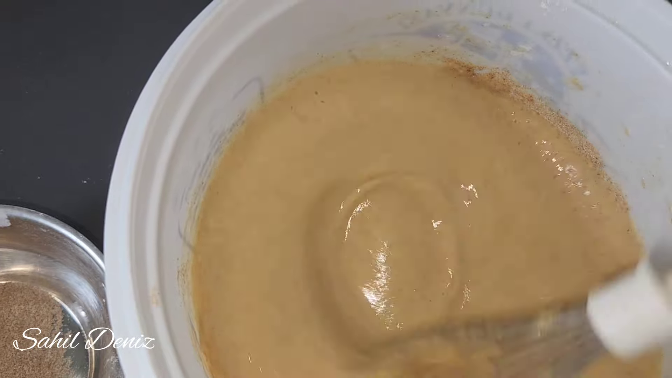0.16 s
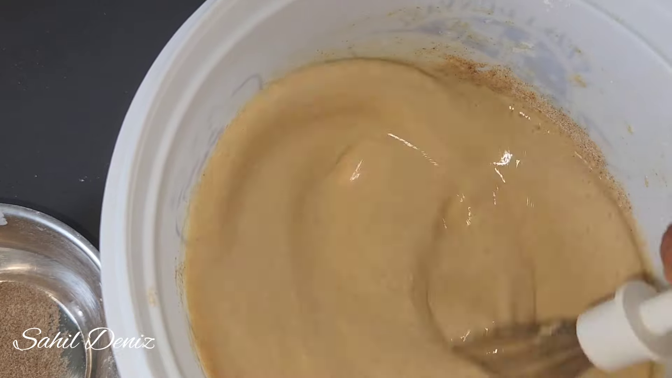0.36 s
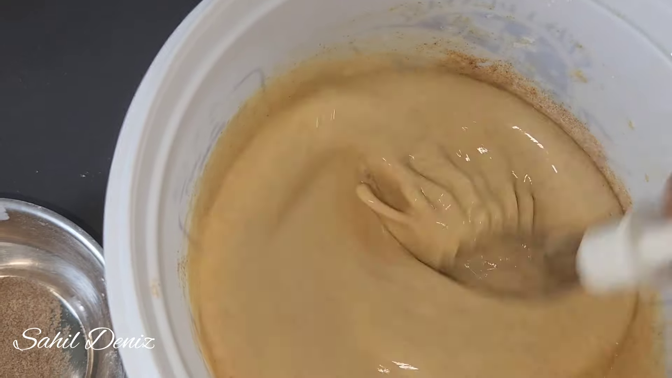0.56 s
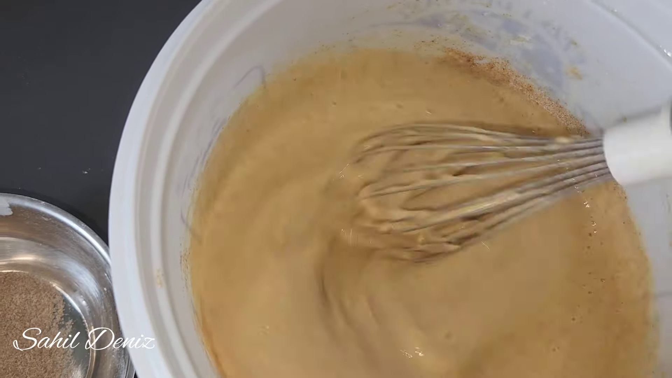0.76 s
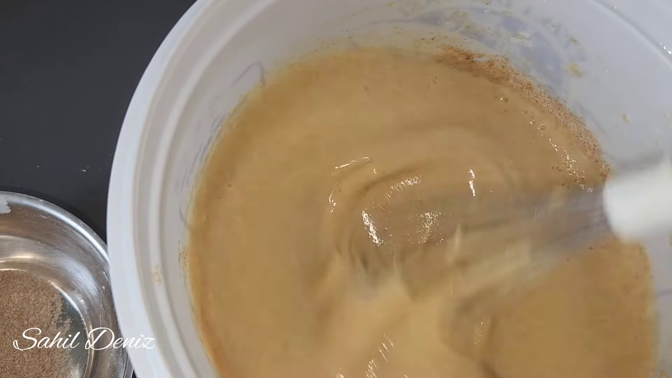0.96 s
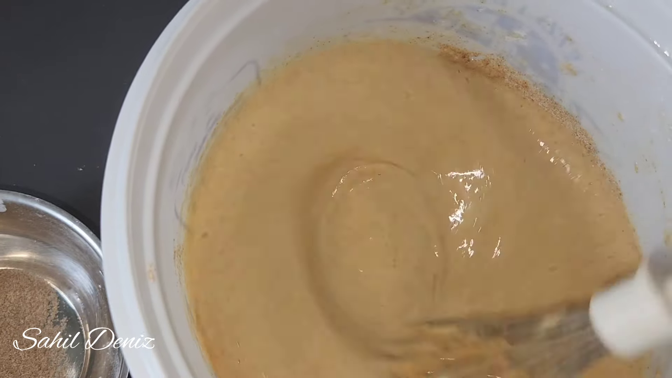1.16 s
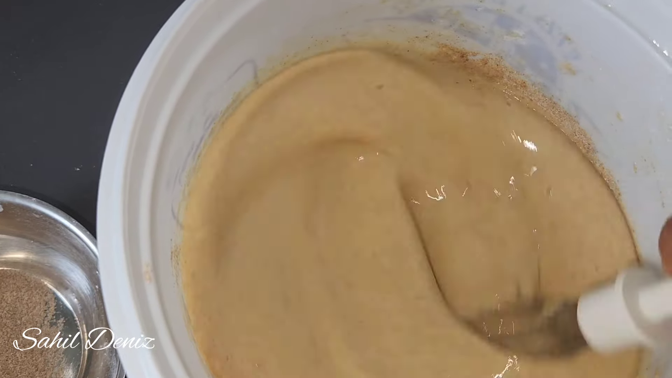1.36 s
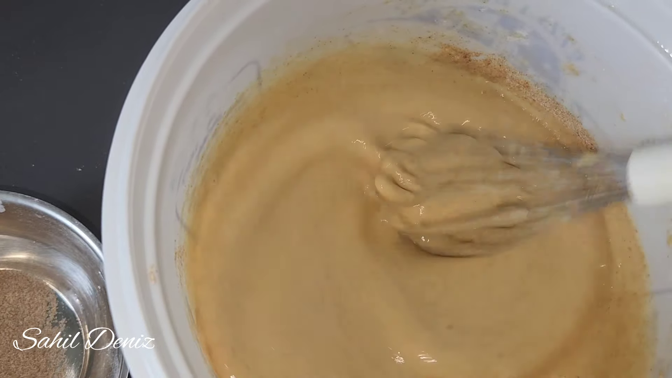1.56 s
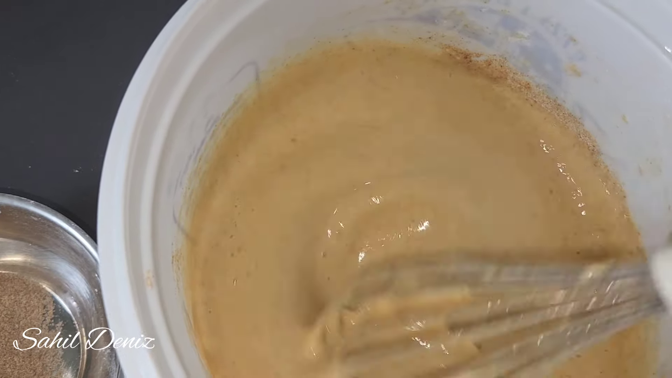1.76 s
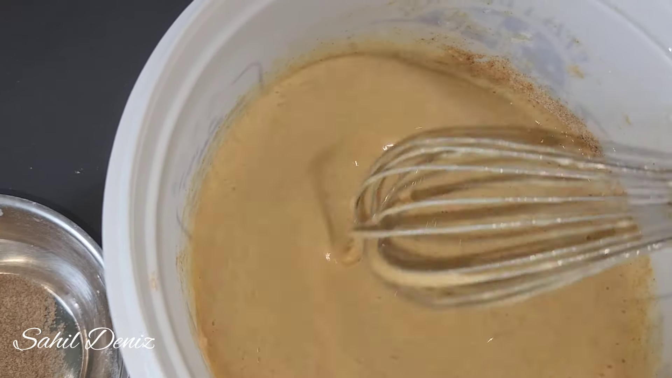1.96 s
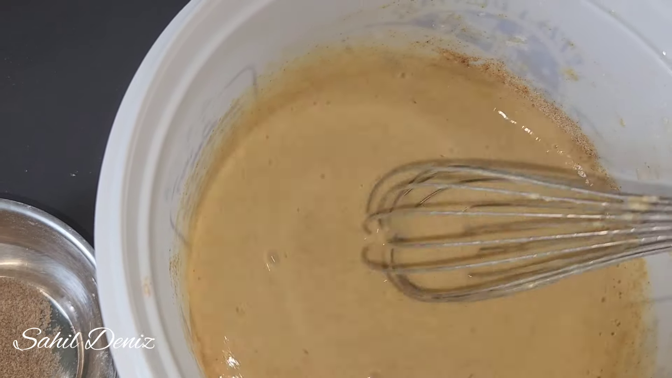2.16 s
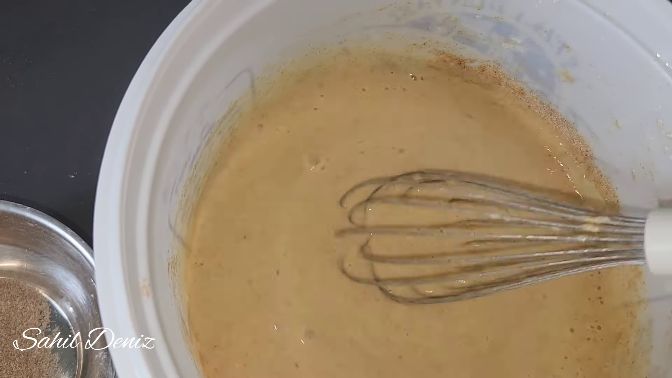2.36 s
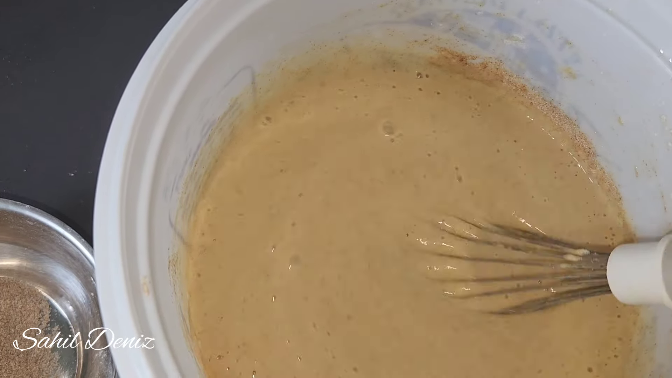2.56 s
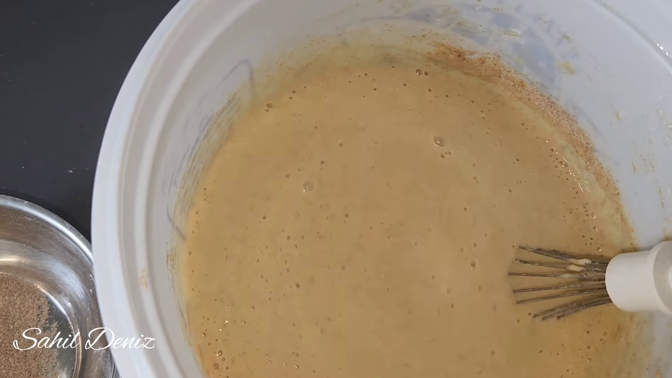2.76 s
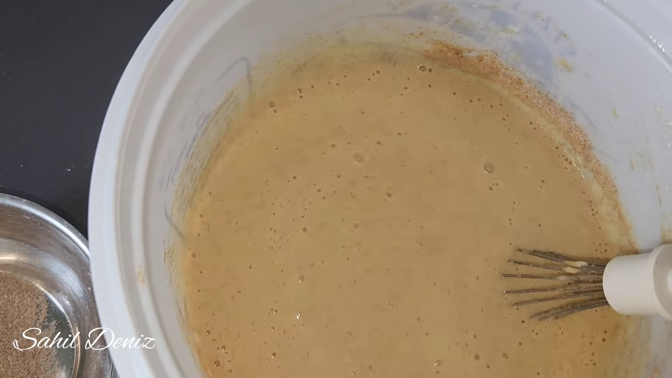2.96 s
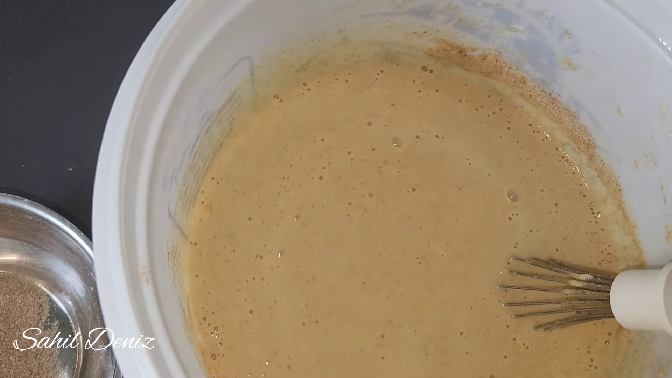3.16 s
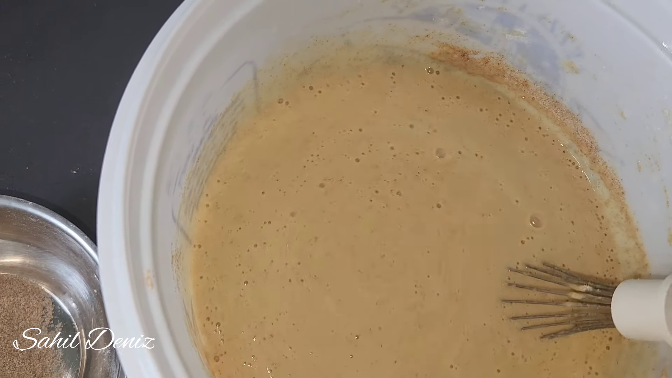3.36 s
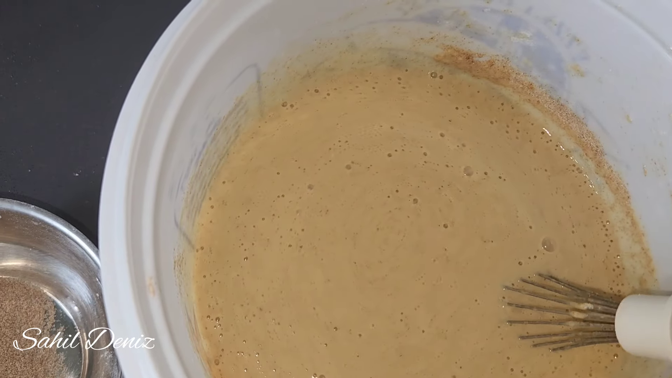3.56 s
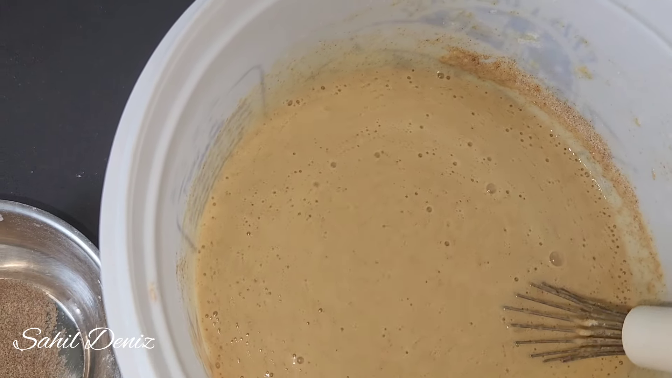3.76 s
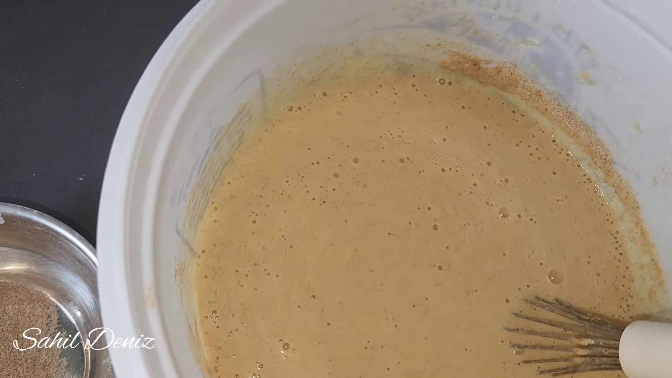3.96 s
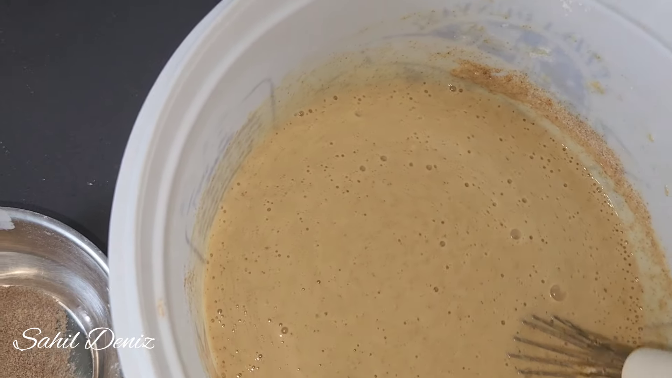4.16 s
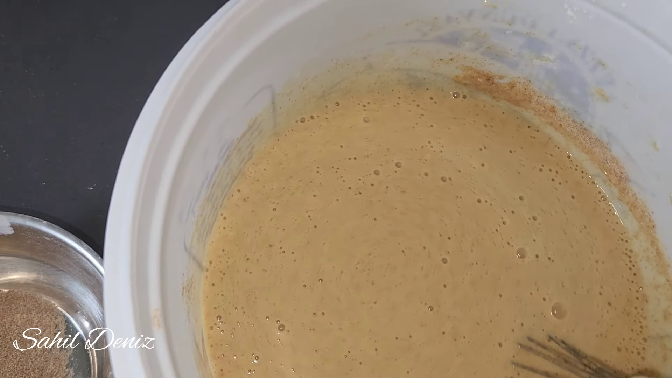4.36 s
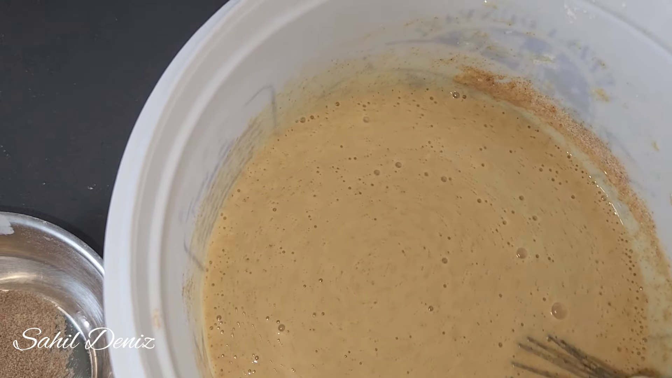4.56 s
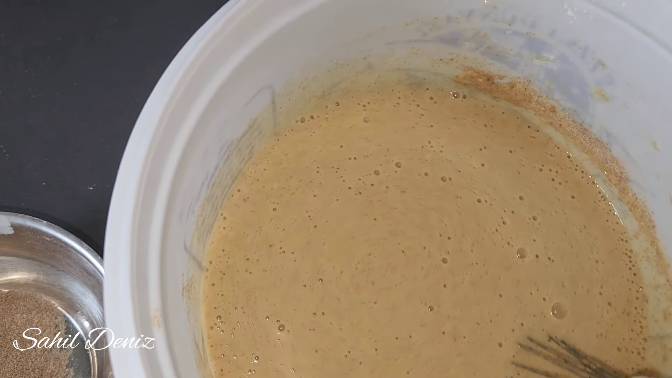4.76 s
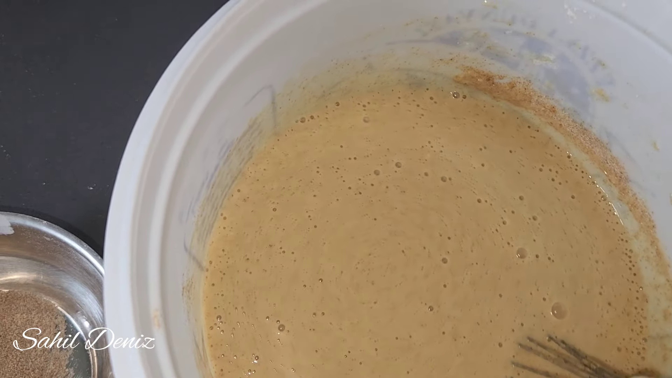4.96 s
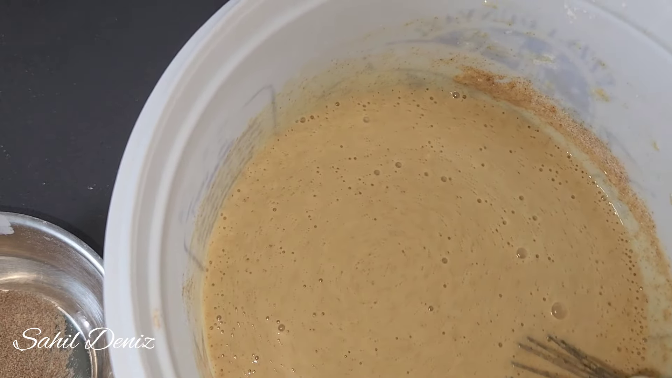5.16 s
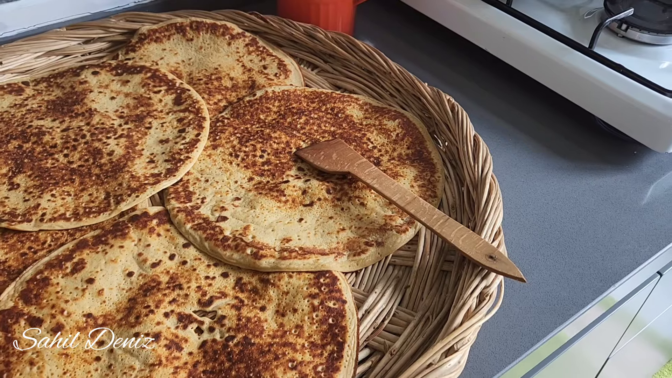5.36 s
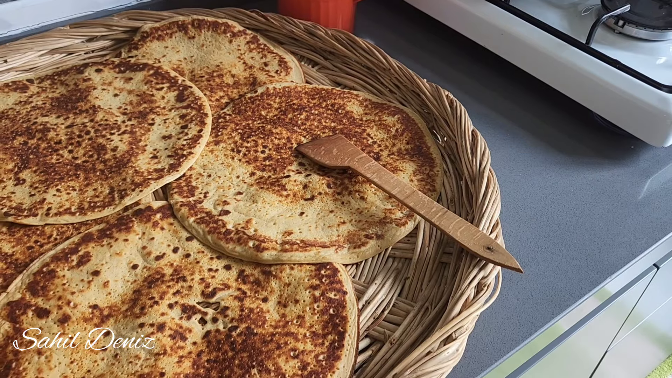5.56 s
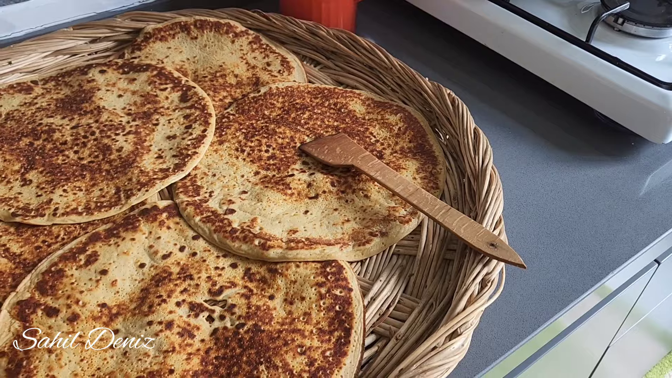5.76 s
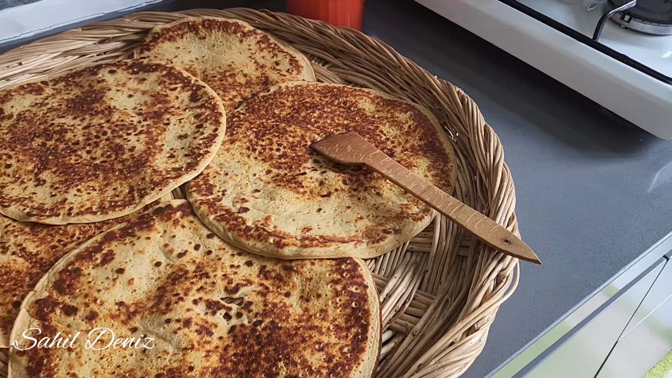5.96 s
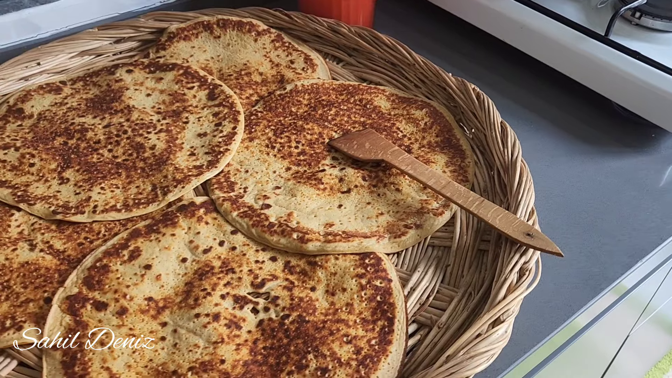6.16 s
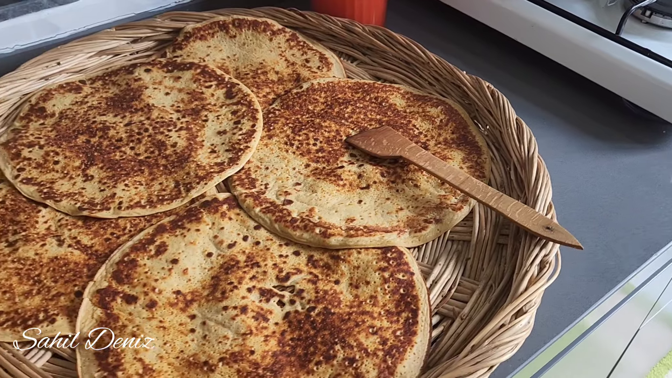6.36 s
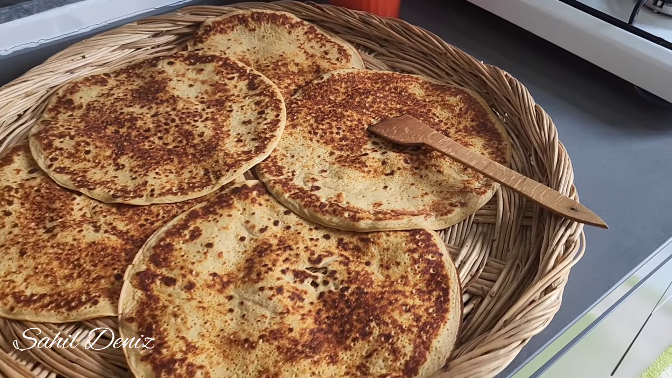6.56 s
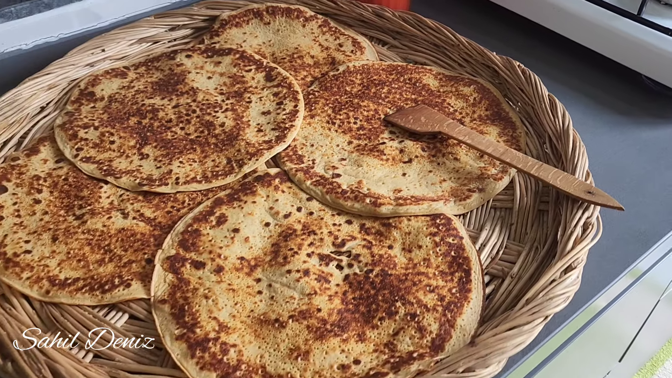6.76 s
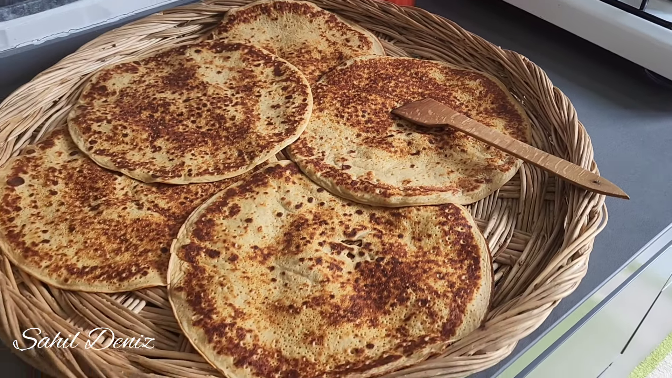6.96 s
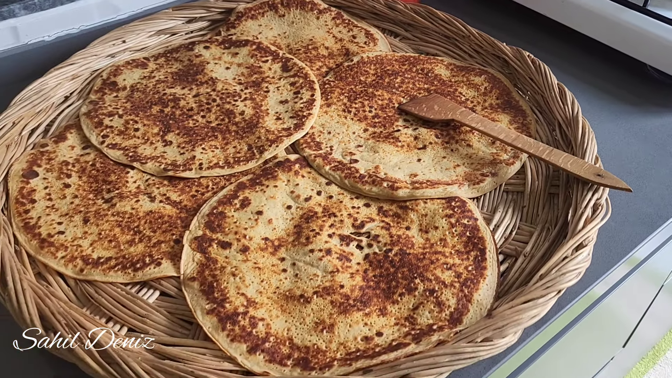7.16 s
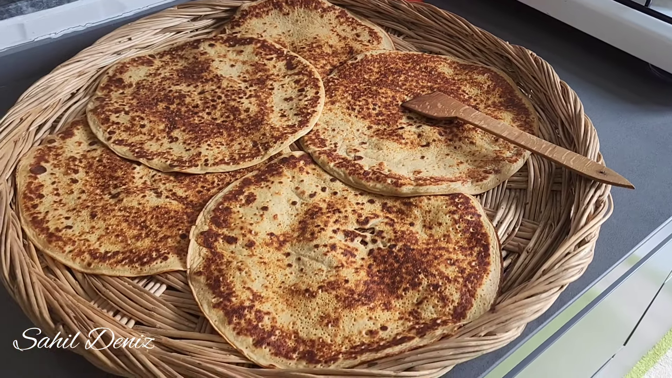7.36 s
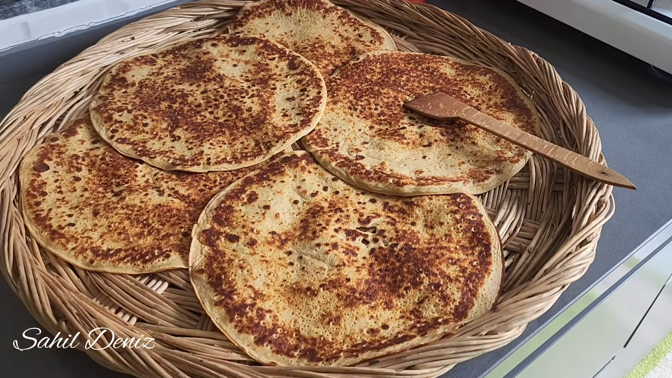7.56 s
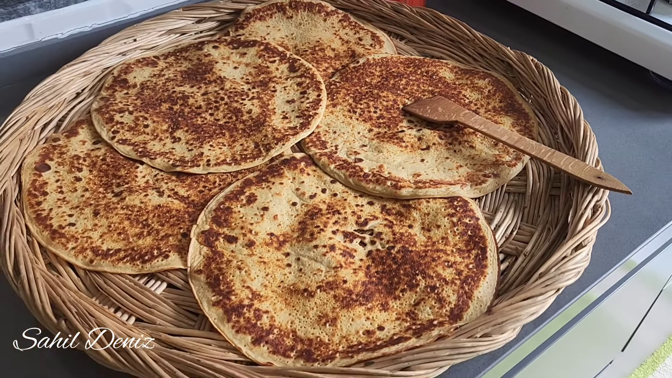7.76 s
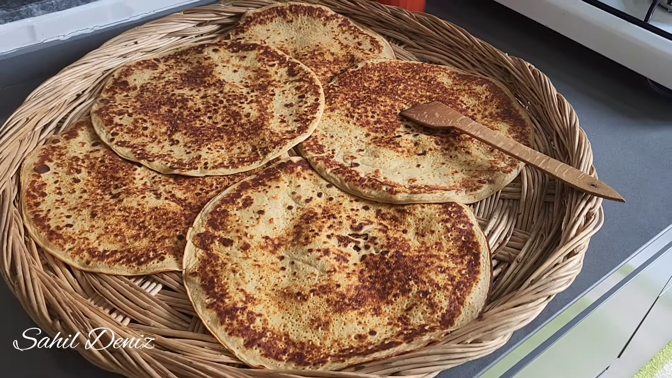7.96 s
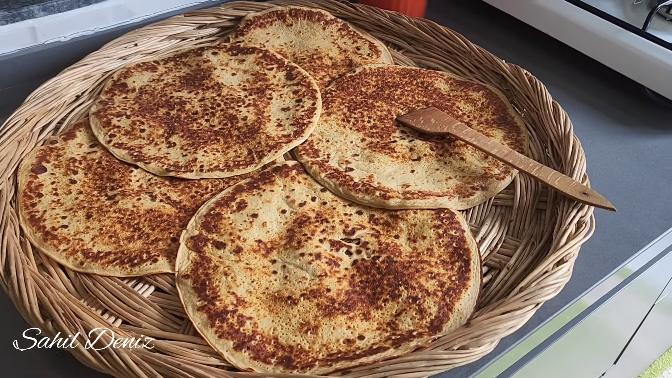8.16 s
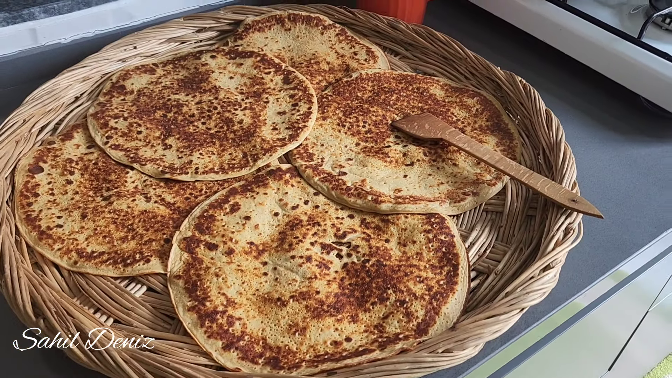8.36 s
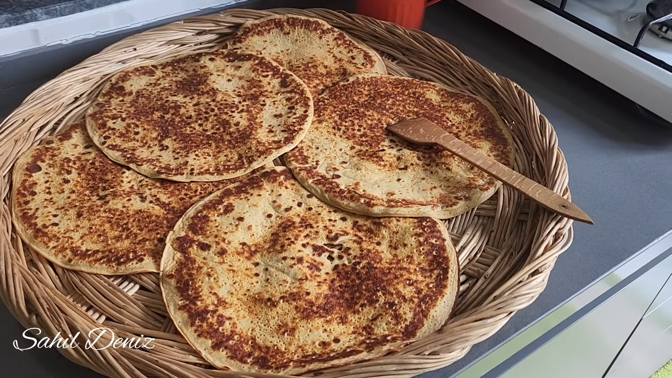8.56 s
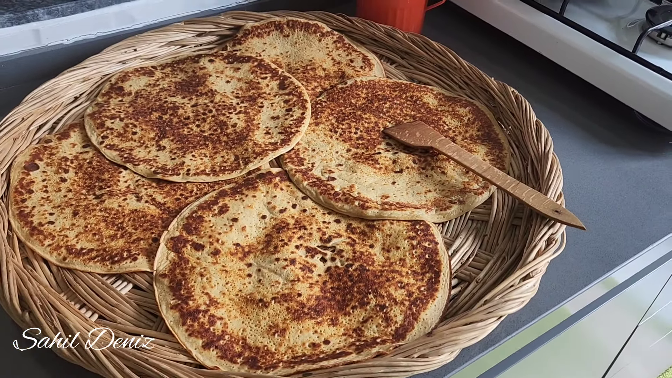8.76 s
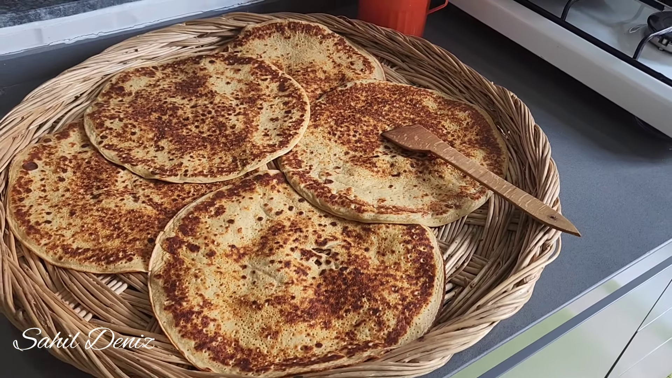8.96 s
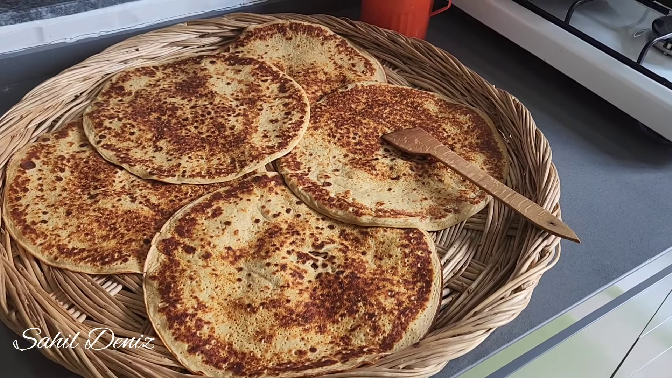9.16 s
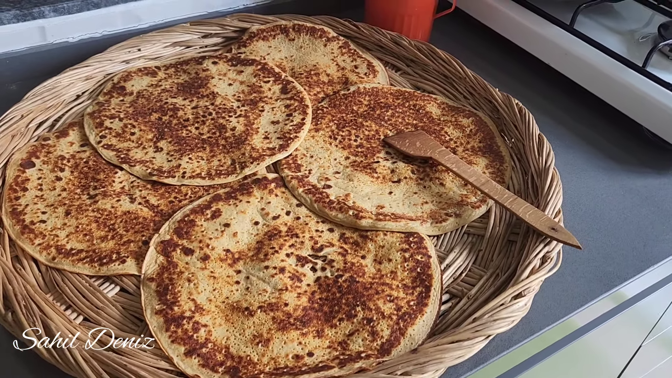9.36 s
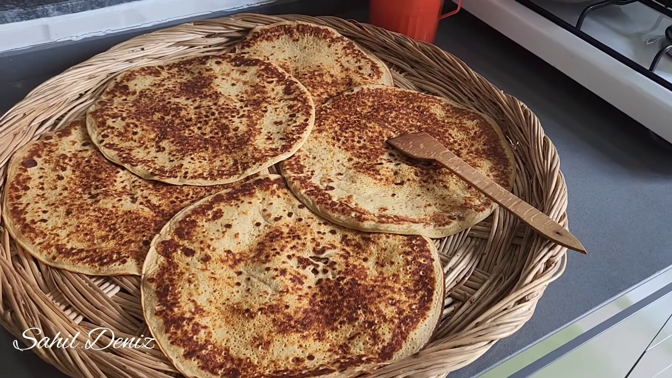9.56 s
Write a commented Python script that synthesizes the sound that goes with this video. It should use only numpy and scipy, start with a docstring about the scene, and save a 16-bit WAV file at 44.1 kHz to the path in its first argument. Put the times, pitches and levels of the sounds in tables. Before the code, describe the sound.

From the start, a wire whisk beats runny batter in a plastic bowl, close and left of a phone microphone in a kitchen. Sharp, uneven knocks mix with wet squelches, round gloops and dull thuds through the counter, loudest around 0.25 and 0.75 seconds. The beating ends near 1.7 seconds, and drops tick off the lifted whisk until about 2.2. A far engine drone enters around 1.2 seconds, rising slowly in pitch and receding after 2.8, over faint traffic rumble and room tone. The whisk is laid down with light taps at 2.6 and a soft knock at 3 seconds, rasping and squeaking faintly along the rim until about 4.7. At 5.2 seconds everything cuts to silence for an instant. A quiet, steady airy hiss with a low hum follows, shifting slightly in colour, with barely audible rustles near 7.8 and 9.4 seconds, ending around 9.6.

```python
"""Sharp plastic knocks and wet squelches, left of a phone: a wire whisk beats runny batter in a bowl.
The wires strike the wall and drag through the batter; drops tick off the lifted whisk, which is laid
down and rasps along the rim over room tone, a far engine drone and a traffic rumble.
After a short silent cut the phone drifts across a quiet kitchen filled with a steady airy hiss."""
import sys
import numpy as np
from scipy import signal
from scipy.fft import rfft, irfft
from scipy.io import wavfile
from scipy.ndimage import uniform_filter1d, map_coordinates

SR = 44100
rng = np.random.default_rng(int(sys.argv[2]) if len(sys.argv) > 2 else 0)


def int16_out(signal):
    """Quantize to a 16-bit WAV file."""
    q = np.round(np.clip(np.atleast_2d(signal).T, -1, 1) * 32767)
    wavfile.write(sys.argv[1], SR, q.astype(np.int16))


N = 423360
TIME = np.arange(N) / SR


def undb(db):
    return 10 ** (np.asarray(db) / 20)


def unit(x):
    return x / np.sqrt(np.mean(x ** 2))


def pan(left_minus_right_db):
    return undb(np.array([left_minus_right_db, -left_minus_right_db]) / 2).reshape(2, -1)


def bandpass(x, lo_hz, hi_hz, order=2):
    return signal.sosfilt(signal.butter(order, [lo_hz, hi_hz], "band", fs=SR, output="sos"), x)


def add(track, start_s, sound):
    i = int(start_s * SR)
    track[:, i:i + sound.shape[1]] += sound[:, :N - i]


def automation(table):
    """One lane per column, ramping between the times in the first column."""
    times, *columns = np.transpose(table)
    return [np.interp(TIME, times, column) for column in columns]


def wobble(per_s):
    """Ramps between random values; spread near 1."""
    hold = int(SR / per_s)
    return uniform_filter1d(np.repeat(rng.standard_normal(N // hold + 1), hold), hold)[:N]


def ring(modes, scatter_db, attack_cycles=0.99):
    """Struck modes in stereo; the higher the mode, the further its phase turns between the sides."""
    hz, db, t60 = np.transpose(modes)[:, :, None]
    t = np.arange(int(t60.max() * SR)) / SR
    strength, detune, turn = rng.standard_normal((3, len(modes), 1))
    attack = 1 - np.exp(-(t * hz / attack_cycles) ** 2)  # a soft contact builds up gradually
    envelope = attack * undb(db + scatter_db * strength - 60 * t / t60)
    phase = 2 * np.pi * hz * (1 + .012 * detune) * t
    out = np.array([np.sum(envelope * np.sin(phase + side * turn * hz / 6000), axis=0) for side in (0, 1)])
    return out / np.sqrt(np.sum(undb(db) ** 2))


def grit(per_s, spread_db):
    """Random clicks of unequal size: wires catching and letting go."""
    size = rng.standard_normal(N) * undb(spread_db * np.minimum(rng.exponential(size=N), 3))
    return size * (rng.random(N) < per_s / SR)


def rub(friction, modes):
    """Friction keeps a set of modes ringing; rms 1."""
    return unit(signal.fftconvolve(friction[None], ring(modes, 0), axes=1)[:, :N])


def crackle(modes, ring_db, lo_hz, hi_hz):
    """Dense, wide crackle, tinted by the modes it shakes; rms 1."""
    centre = grit(9000, 7.1)
    wide = np.array([grit(8000, 3.6), grit(9000, 2.5)])
    broad = unit(bandpass(centre + 6.2 * wide, lo_hz, hi_hz))
    return unit(broad + undb(ring_db) * rub(centre, modes))


def air(spectrum, peaks, correlation, peak_db=0):
    """A stereo noise bed with resonances on top; rms 1."""
    f = np.maximum(np.arange(N // 2 + 1) * SR / N, 1)

    def curve(table):
        hz, values = np.transpose(table)
        return np.interp(np.log(f), np.log(hz), values)

    power = undb(curve(spectrum)) ** 2
    for hz, width, db in peaks:
        power += undb(db + peak_db) ** 2 / (1 + (2 * (f - hz) / width) ** 2) ** 1.3
    alike = np.clip(curve(correlation), -1, 1)
    mid = irfft(rfft(rng.standard_normal(N)) * np.sqrt(power * (1 + alike)), N)
    side = irfft(rfft(rng.standard_normal(N)) * np.sqrt(power * (1 - alike)), N)
    return unit(np.array([mid + side, mid - side]))


# Modes of the clacky wall, the hollow belly and the bright wires: f/Hz, level/dB, t60/s
WALL_MODES = [(1421, -2.5, 0.018), (2105, -4, 0.023), (2483, -14.5, 0.046), (2565, -16.5, 0.01),
              (3070, 2.5, 0.0094), (3900, -7.5, 0.019), (4170, 3, 0.0067), (4510, -7, 0.011),
              (4840, -14, 0.023)]
BELLY_MODES = [(336.2, -10, 0.11), (394, -4, 0.052), (575, -13, 0.081), (609, 2, 0.04), (697, -1, 0.037),
               (754, 2.5, 0.01), (1010, -7.5, 0.05)]
WIRE_MODES = [(5700, -3, .006), (6250, -1, .005), (6840, -2, .004), (7300, -1, .006), (8200, -2, .004),
              (9500, -4, .003), (11000, -5, .002), (12600, -6, .002), (14300, -7, .002)]
# Whisk hits on the bowl: t/s, wall level/dB, struck spot f/Hz, belly level/dB, wire level/dB
KNOCKS = [(0.0527, -34.5, 4020, -59, -48), (0.0573, -39, 4090, -46, -31), (0.0853, -19, 3100, -32.5, -19.5),
          (0.11, -33, 1530, -27, -49), (0.2432, -17, 1950, -10, -11), (.297, -33, 3680, -29, -34),
          (0.3118, -19.5, 3470, -26, -31), (0.3135, -20.5, 4060, -23.5, -34), (.477, -38.5, 4640, -67, -41),
          (0.4895, -45, 4770, -62, -36), (0.4975, -37.5, 3180, -60, -50), (0.5025, -40, 3860, -59, -41),
          (.5743, -26.5, 2030, -25.5, -40), (0.5854, -30, 3100, -49, -32), (0.6377, -46, 1490, -30.5, -52),
          (.6578, -34.5, 2170, -56, -43), (0.7351, -10.5, 3160, -44, -21.5),
          (0.7393, -17, 2040, -30, -25.5), (0.75, -33, 2190, -55, -35), (0.833, -32, 2250, -25, -38),
          (.8798, -29.5, 1400, -25, -52), (.9962, -44, 3870, -70, -27.5), (1.072, -27.5, 3900, -42.5, -35),
          (1.1219, -29.5, 2480, -25.5, -51), (1.2349, -26.5, 4070, -47, -13.5),
          (1.246, -40, 4060, -61, -25), (1.297, -26, 2780, -31, -39), (1.3929, -41, 2420, -31.5, -59),
          (1.414, -34, 2450, -36, -52), (1.5143, -43, 4500, -67, -38), (1.5715, -19.5, 1360, -36, -26.5),
          (1.5831, -24, 3070, -43, -44), (1.62, -41, 1590, -35, -39), (2.6115, -59, 2570, -48, -72),
          (2.6282, -52, 1540, -44.5, -79), (3.032, -30.5, 4100, -31.5, -43),
          (3.0415, -34.5, 1470, -38, -63), (3.052, -34, 2040, -35.5, -52)]
SPOT_DB, SPOT_T60_S = 12, 0.006
LIFT_S, LIFT_FADE_S = 1.687, 0.13  # the whisk leaves the batter


def knocks():
    """Several wires land within a few ms; wall, wires and belly ring on."""
    out, t = np.zeros((2, N)), np.arange(500) / SR
    # laid down, the whisk rocks the low belly modes: darker and longer
    rocked = [(hz, db - 9.5 * np.log2(hz / BELLY_MODES[0][0]), 1.9 * t60) for hz, db, t60 in BELLY_MODES]
    for start, wall_db, spot_hz, belly_db, wire_db in KNOCKS:
        landing = 0.16 * rng.standard_normal((1, len(t))) * np.exp(-t / 0.0025)
        landing[0, 0] = 1  # the first wire hits hardest
        wall_pan = pan(16.5 - 3 * rng.standard_normal())
        wall = ring(WALL_MODES + [(spot_hz, SPOT_DB, SPOT_T60_S)], 3.3) * undb(wall_db) * wall_pan
        wires = ring(WIRE_MODES, 2.8) * undb(wire_db) * pan(3.2)
        belly = ring(rocked if start > LIFT_S else BELLY_MODES, 2.014) * undb(belly_db) * pan(2.5)
        add(out, start, signal.fftconvolve(wall, landing, axes=1))
        add(out, start, signal.fftconvolve(wires, landing, axes=1))
        add(out, start, belly)
    return out


# Low modes of the counter: f/Hz, level/dB, t60/s
COUNTER_MODES = [(59, -5.5, 0.42), (97.2, 1.5, 0.56), (122.7, 4.5, 0.27), (141, -5.5, 0.3)]
# Weight under the hits: t/s, level/dB, main ring f/Hz
THUDS = [(0.249, -28, 92.7), (0.275, -41.5, 119.4), (.58, -35, 116.7), (0.637, -40, 85),
         (0.747, -39.5, 118.5), (0.839, -40, 112.5), (1.119, -58, 110), (1.299, -31, 120.4),
         (1.31, -32, 90.8), (1.575, -34, 116), (1.592, -32.5, 58), (3.035, -50.5, 148)]


def thuds():
    """Hard strokes jolt the counter through the bowl."""
    out = np.zeros((2, N))
    for start, db, hz in THUDS:
        add(out, start, ring(COUNTER_MODES + [(hz, 8, .3)], 2, attack_cycles=1.8) * undb(db))
    return out


# Wet strokes: t/s, length/s, level/dB, belly send/dB, wire send/dB
SQUELCHES = [(.092, 0.074, -48, -8, -10.5), (0, 0.025, -71.5, 3, 11), (0.234, 0.0096, -38, -21, -3.5),
             (0.243, 0.027, -46, 3.5, -6.5), (0.271, 0.04, -57.5, -8, 8), (0.314, 0.1, -78, 20, -11),
             (0.494, 0.021, -66, -12, 11), (0.572, 0.051, -49, 0, -7.5), (0.626, 0.058, -54, -11, -3),
             (0.721, 0.062, -53, -5, -9.5), (0.79, 0.076, -55, -19, -16), (0.827, 0.093, -55, -3, -6.5),
             (.966, 0.052, -73, -22, 3), (1.068, 0.017, -54.5, -19, 4.5), (1.12, 0.057, -48, -29, -9.5),
             (1.218, 0.055, -58, -13, 5.5), (1.288, .038, -42.5, -0.5, -14), (1.328, 0.058, -66, 12, -4),
             (1.391, 0.039, -48, -10, -19), (1.51, 0.015, -75.5, -13, 4), (1.564, 0.052, -44, 3.5, -12)]
DRAG_DB, SHAKE_DB, SQUELCH_FALL_DB = -66, -55, 1.5


def batter():
    """Batter squelches through the wires; between strokes they drag faintly and shake the counter."""
    wall = crackle(WALL_MODES, 4.4, 995, 6000) * pan(10)
    belly = crackle(BELLY_MODES, 8.7, 200, 1300) * pan(3)
    wires = crackle(WIRE_MODES, -13.5, 5000, 13000)
    drag_gain = undb(DRAG_DB + 3.3 * wobble(25))
    drag = wall + undb(-5.5) * bubbles() + undb(-5) * belly + undb(-14.5) * wires
    shake = undb(SHAKE_DB + 3.9 * wobble(9)) * rub(rng.standard_normal(N), COUNTER_MODES)
    beating = np.clip(1 - (TIME - LIFT_S) / LIFT_FADE_S, 0, 1)
    out = beating * (drag_gain * drag + shake)
    splatter = wall + undb(-1.5) * bubbles()
    flutter = undb(2.9 * wobble(170))
    for start, length, db, belly_db, wire_db in SQUELCHES:
        span = slice(int(start * SR), int((start + length) * SR))
        size = span.stop - span.start
        fall = undb(db - SQUELCH_FALL_DB * np.linspace(-.5, .5, size))
        mix = splatter[:, span] + undb(belly_db) * belly[:, span] + undb(wire_db) * wires[:, span]
        out[:, span] += signal.windows.tukey(size, .45) * flutter[span] * fall * mix
    return out


BUBBLES_PER_S, BUBBLING_S, BUBBLE_HZ, BUBBLE_DECAY_CYCLES = 170, 1.8, 1904, 4.5


def bubbles():
    """Air pockets burst in the beaten batter, each a tiny upward chirp; rms 1 while they last."""
    count = int(BUBBLES_PER_S * BUBBLING_S)
    starts = rng.random(count) * BUBBLING_S
    pitch, size, position = rng.standard_normal((3, count))
    hz = np.clip(BUBBLE_HZ * 2 ** (.8 * pitch), 500, 8000)
    cycles = hz[:, None] * np.arange(600) / SR
    envelopes = undb(2.9 * size)[:, None] * np.exp(-cycles / BUBBLE_DECAY_CYCLES)
    pops = envelopes * np.sin(2 * np.pi * cycles * (1 + .012 * cycles))
    out = np.zeros((2, N))
    for start, pop, pan_db in zip(starts, pops, 9 + 4 * position):
        add(out, start, pop * pan(pan_db))
    return unit(out) * np.sqrt(BUBBLING_S * SR / N)


# Round, low gloops: t/s, level/dB, f/Hz
GLOOPS = [(.1095, -25, 660), (.2441, -11, 690), (.247, -27.5, 386), (.3149, -32, 755), (.5743, -33, 750),
          (.6383, -36.5, 630), (.834, -37.5, 544), (.8798, -31, 620), (1.072, -36, 752), (1.1211, -28, 685),
          (1.296, -39, 580), (1.3935, -41, 610), (1.4144, -42, 646), (1.5713, -26, 570), (1.5845, -38, 400)]


def gloops(t60_s=0.05):
    """Hollows in the batter close behind the wires, one soft ring each."""
    out = np.zeros((2, N))
    for start, db, hz in GLOOPS:
        add(out, start, ring([(hz, 0, t60_s)], 0, attack_cycles=2) * undb(db) * pan(4.1))
    return out


# Crisp, bright ticks: t/s, level/dB
TICKS = [(0.217, -35.5), (.236, -47), (.5496, -51), (0.9852, -37), (1.0484, -57), (1.4544, -52),
         (1.4947, -45.5), (1.7704, -75), (1.8148, -49.5), (1.8627, -58), (1.9024, -69.5), (1.9344, -36),
         (2.015, -48), (2.1048, -73.5), (2.1669, -69.5), (3.9411, -77), (4.1047, -74.5), (4.533, -68),
         (4.9346, -66.5)]


def ticks():
    """Light wire taps while beating, then drips off the lifted whisk: each a spike with a short tail."""
    out, t = np.zeros((2, N)), np.arange(900) / SR
    low_cut = signal.butter(2, 2400, "high", fs=SR, output="sos")
    envelope = np.exp(-t / 0.0019) + 0.22 * np.exp(-t / 0.011)
    for start, db in TICKS:
        add(out, start, undb(db) * envelope * signal.sosfilt(low_cut, rng.standard_normal((2, len(t)))))
    return out


# Modes of the rim and of the handle's squeak: f/Hz, level/dB, t60/s
RIM_MODES = [(2570, -2, .015), (3430, -3, .012), (4150, 2, .03), (4970, -5, .015)]
SQUEAK_MODES = [(1325, 6.5, 0.058), (365, 8, 0.033), (560, 3, 0.07), (2200, -1, 0.029)]
# Slips of the resting whisk: t/s, length/s, rasp level/dB, squeak level/dB
SLIPS = [(2.59, 0.056, -68.5, -72), (2.725, .11, -62, -76.5), (2.932, 0.16, -60, -72),
         (2.996, 0.05, -56, -78), (3.019, .1, -74, -64), (3.249, 0.12, -67, -78.5),
         (3.43, 0.098, -60.5, -74), (3.597, 0.062, -61, -69.5), (3.732, 0.12, -65.5, -68),
         (4.051, 0.24, -72, -67), (4.224, .14, -66.5, -57.5), (4.34, 0.092, -63.5, -64),
         (4.405, 0.085, -67.5, -62), (4.461, 0.29, -72, -69.5)]


def rim_slide():
    """Wires rasp on the rim and the handle squeaks by stick-slip; each slip swells and fades."""
    rasp = crackle(RIM_MODES, 2.5, 2060, 3900) + undb(-15.5) * crackle(WIRE_MODES, -16.5, 4500, 7300)
    rasp *= undb(3 * wobble(150))
    squeak = rub(grit(900, 1.8), SQUEAK_MODES)
    out = np.zeros((2, N))
    for start, length, rasp_db, squeak_db in SLIPS:
        span = slice(int(start * SR), int((start + length) * SR))
        mix = undb(rasp_db) * rasp[:, span] + undb(squeak_db) * squeak[:, span]
        out[:, span] += signal.windows.tukey(span.stop - span.start, .7) * mix
    return out * pan(4)


def froth(start_s=4.05, end_s=5.0):
    """Faint treble fizz on the resting batter: sparse clicks, each smeared over a few ms."""
    clicks = grit(70, 2.2) * (TIME > start_s) * (TIME < end_s)
    snap = rng.standard_normal((2, 400)) * np.exp(-TIME[:400] / 0.0017)
    fizz = signal.fftconvolve(clicks[None], snap, axes=1)[:, :N]
    return undb(-75) * bandpass(fizz, 4500, 11000)


def kitchen_reverb(source, t60_s=0.11, wet_db=-15):
    """A tight, diffuse midrange tail, unrelated left and right."""
    t = np.arange(SR // 2) / SR
    tail = rng.standard_normal((2, len(t))) * undb(-60 * t / t60_s) * np.minimum(t / 0.002, 1)
    tail = bandpass(tail, 300, 5000, order=1)
    tail /= np.sqrt(np.sum(tail[0] ** 2))
    return undb(wet_db) * signal.fftconvolve(source.mean(axis=0)[None], tail, axes=1)[:, :N]


# Tone curve of the airy hiss: f/Hz, level/dB
HISS_SPECTRUM = [(15, -46), (25, -6.5), (105, -5.5), (245, -18.5), (422, -14.5), (496, -20.5), (831, -10.5),
                 (1150, -18.5), (1980, -16.5), (3150, -20.5), (3700, -21), (4360, -27.5), (7510, -22),
                 (15750, -38.5), (16050, -48)]
# Its resonances in the start and end colours: f/Hz, width/Hz, level/dB
HISS_START_PEAKS = [(103.4, 12.3, 10), (805, 27, -23.5), (1490, 360, -10), (1950, 180, -8),
                    (2473, 96, -4.5), (3806, 190, -5), (4730, 150, -18), (7300, 97, -56), (8000, 300, -44),
                    (8650, 260, -17.5), (11500, 350, -21), (13000, 350, -20), (14600, 580, -23)]
HISS_END_PEAKS = [(101.8, 7.2, 6.5), (845, 26, -13), (1530, 125, -12), (2008, 67, -7.5), (3510, 64, -13),
                  (4980, 680, -18), (6800, 140, -14), (7530, 460, -14.5), (9050, 180, -20),
                  (10000, 220, -20), (10790, 270, -16), (13100, 330, -18), (14700, 500, -21)]
# Its stereo image: f/Hz, left-right correlation
HISS_CORRELATION = [(60, 0.98), (130, 0.93), (290, 0.68), (640, 0.69), (1410, 0.16), (3100, -0.025),
                    (6820, -0.15), (15000, 0.075)]
# The move across the kitchen: t/s, level/dB, share of the end colour, leftward pan/dB
DRIFT = [(5.25, -56.5, 0.19, 1.7), (6.05, -55.5, 0.12, 1), (6.35, -55.5, 0.41, 1), (7.8, -57, 0.93, -1),
         (9.0, -57.5, 0.94, -0.5), (9.6, -56.5, 0.97, -1)]
CUT_START_S, CUT_END_S = 5.203, 5.243


def hiss():
    """Two colours of one steady hiss crossfade as the phone moves; their pitch wanders slightly."""
    db, share, pan_db = automation(DRIFT)
    start_colour = air(HISS_SPECTRUM, HISS_START_PEAKS, HISS_CORRELATION, peak_db=-3.1)
    end_colour = air(HISS_SPECTRUM, HISS_END_PEAKS, HISS_CORRELATION, peak_db=-0.12)
    gain = undb(db + .4 * wobble(5))
    mix = np.sqrt(1 - share) * start_colour + np.sqrt(share) * end_colour
    offset = np.cumsum(.009 * wobble(1.5))  # varispeed of about 1 %
    playhead = np.arange(N) + offset - offset[int(CUT_END_S * SR)]
    mix = np.array([map_coordinates(channel, [playhead], order=5, mode="mirror") for channel in mix])
    return mix * gain * pan(pan_db)


# Soft rustles and swells late in the hiss: t/s, length/s, f/Hz, width/Hz, level/dB
SWELLS = [(7.823, .07, 6000, 4500, -60.5), (8.954, .8, 450, 179, -67.5), (9.382, .4, 2030, 346, -63.5),
          (9.402, .06, 1520, 2578, -59.5)]


def swells():
    """Bands of noise fade in and out."""
    out = np.zeros((2, N))
    for start, length, hz, width, db in SWELLS:
        size = int(length * SR)
        noise = unit(bandpass(rng.standard_normal((2, size)), hz - width / 2, hz + width / 2))
        add(out, start, undb(db) * signal.windows.tukey(size, .4) * noise)
    return out


# Fader ride of the far engine: t/s, level/dB
ENGINE_LEVEL = [(1.15, -64), (1.3, -58), (1.58, -44.5), (1.74, -59), (1.86, -52.5), (2.12, -49.5),
                (2.22, -57), (2.46, -42.5), (2.57, -50), (2.74, -43), (2.84, -66), (3.0, -54),
                (3.12, -63.5), (3.35, -56), (3.9, -61.5), (4.5, -59), (4.85, -62.5), (5.2, -62)]
# Its roughness: t/s, waver as a share of pitch
ENGINE_WAVER = [(2.75, .012), (2.95, .055)]
ENGINE_START_S, ENGINE_START_HZ, RISE_HZ_PER_S, EASE_HZ_PER_S2 = 1.15, 51, 11.8, 0.298


def engine():
    """A far engine speeds up, a little less so later; its low drone grows rougher as it recedes."""
    (db,), (waver,) = automation(ENGINE_LEVEL), automation(ENGINE_WAVER)
    elapsed = TIME - ENGINE_START_S
    hz = ENGINE_START_HZ + RISE_HZ_PER_S * elapsed - EASE_HZ_PER_S2 * elapsed ** 2
    hz *= 1 + waver * wobble(30)
    fade_in = np.clip(elapsed / 0.14 + 1, 0, 1)
    gain = fade_in * undb(db + 72 * waver * wobble(21))
    return gain * np.sqrt(2) * np.sin(2 * np.pi * np.cumsum(hz) / SR)


def traffic():
    """Uneven low traffic rumble around the drone."""
    rumble = unit(bandpass(rng.standard_normal(N), 42, 115, order=4))
    return rumble * undb(-62.5 + 1.5 * wobble(3.5))


# Tone curve of the room by the bowl: f/Hz, level/dB
ROOM_SPECTRUM = [(15, -26), (25, -15), (45, -9), (90, -6), (125, -5), (200, -19), (450, -16), (800, -17),
                 (1600, -23), (3300, -22), (5000, -28), (8300, -35), (9500, -46), (15000, -48)]
# Its resonances: f/Hz, width/Hz, level/dB
ROOM_PEAKS = [(337, 34, -2), (543, 32, -8.5), (2463, 390, -10)]
# Its stereo image: f/Hz, left-right correlation
ROOM_CORRELATION = [(60, 0.93), (130, 0.82), (290, 1), (640, 0.46), (1410, -0.13), (3100, -0.19),
                    (6820, -0.3), (15000, -0.39)]


def room_tone():
    """A dark, gently breathing noise bed that leans left."""
    return air(ROOM_SPECTRUM, ROOM_PEAKS, ROOM_CORRELATION) * undb(-66 + 0.49 * wobble(5.3)) * pan(6.1)


def scene():
    """The whisk over its background, a short silent cut, then the hiss."""
    whisk = knocks() + thuds() + gloops() + ticks() + batter() + rim_slide() + froth()
    whisk += kitchen_reverb(whisk)
    whisk[0] = np.roll(whisk[0], int(.00015 * SR))  # the left channel lags slightly
    background = room_tone() + engine() + traffic()
    before_cut = np.clip((CUT_START_S - TIME) / 0.00082, 0, 1)
    after_cut = np.clip((TIME - CUT_END_S) / 0.0017, 0, 1)
    return (whisk + background) * before_cut + (hiss() + swells()) * after_cut


def record(dry):
    """The phone rounds the hardest peaks and cuts the top."""
    high_cut = signal.ellip(12, .2, 100, 16200, fs=SR, output="sos")
    return signal.sosfilt(high_cut, .9 * np.tanh(dry / .9))


dry = scene()
out = record(dry)
int16_out(out)
```